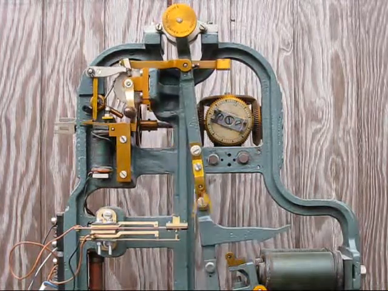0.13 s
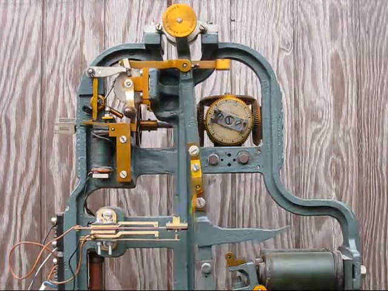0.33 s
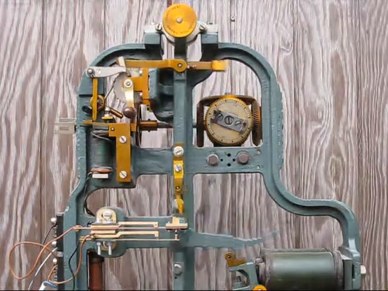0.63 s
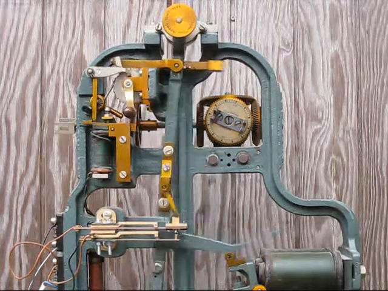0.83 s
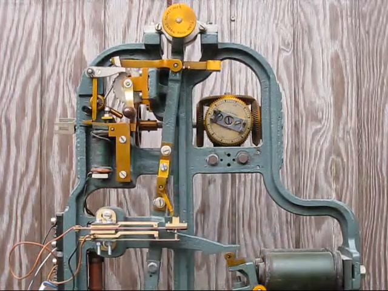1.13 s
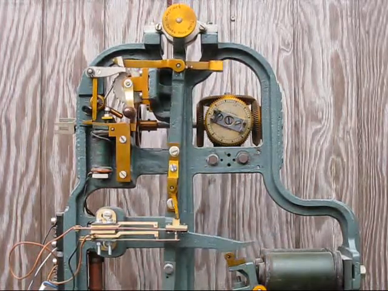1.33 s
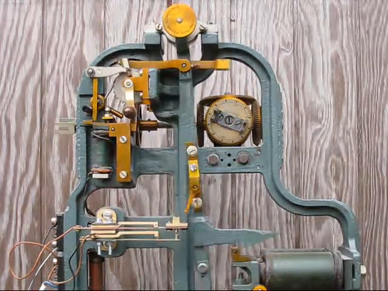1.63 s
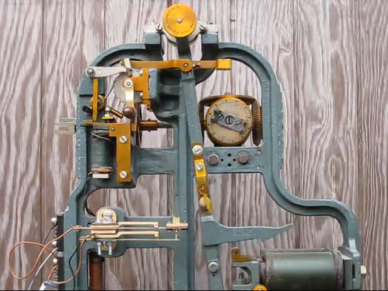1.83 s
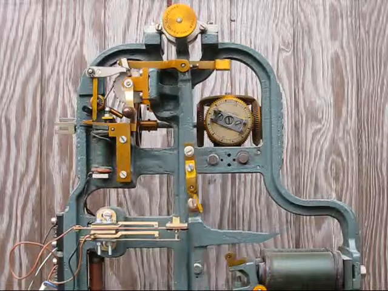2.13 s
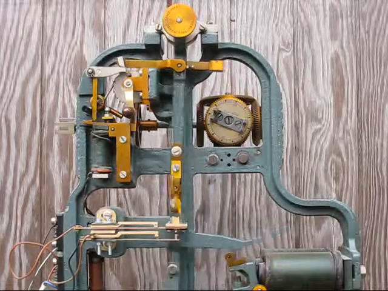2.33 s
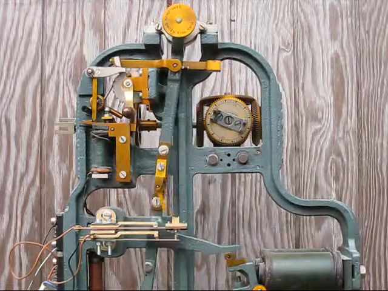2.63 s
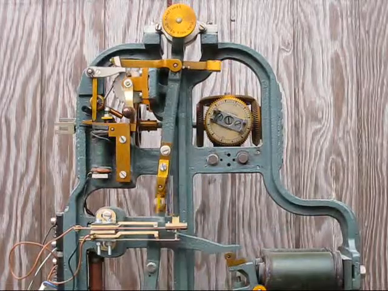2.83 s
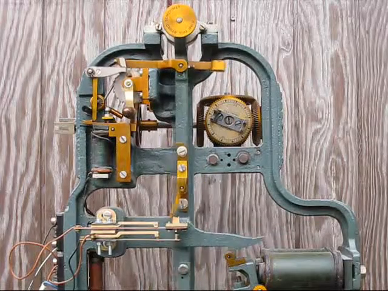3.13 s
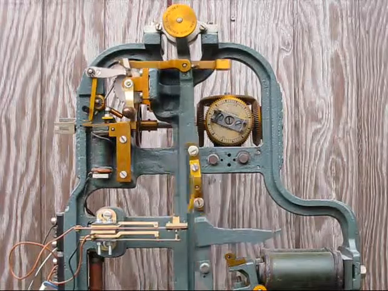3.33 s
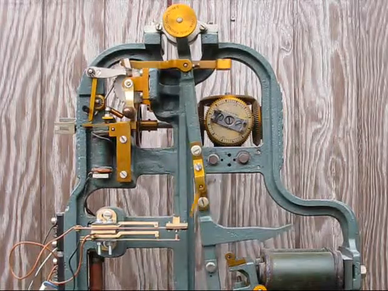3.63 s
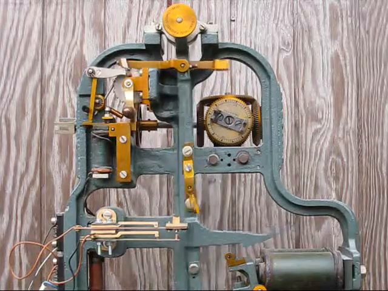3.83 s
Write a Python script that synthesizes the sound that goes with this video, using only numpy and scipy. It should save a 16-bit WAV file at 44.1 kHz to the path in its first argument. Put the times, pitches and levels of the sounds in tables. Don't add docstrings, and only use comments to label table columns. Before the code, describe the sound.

Close-miked clock mechanism snaps and pings irregularly, then levers clack into the iron frame with a short ring and woody thud; low wind puffs thump the microphone throughout, with soft hiss and one faint bird trill.

```python
import sys
import numpy as np
from scipy import signal
from scipy.fft import rfft, irfft
from scipy.io import wavfile
from scipy.ndimage import uniform_filter1d

SR = 44100
rng = np.random.default_rng(int(sys.argv[2]) if len(sys.argv) > 2 else 0)


def boost(x):
    u = np.asarray(x, float) / 20
    return 10 ** u


def transcribe(u):
    v = np.clip(np.atleast_2d(u).T, -1, 1)
    q = np.round(v * 32767).astype(np.int16)
    wavfile.write(sys.argv[1], SR, q)


N = 176400
TIME_S = np.arange(N) / SR


def rms_one(x):
    return x / np.sqrt(np.mean(x ** 2) + 1e-20)


def noise():
    return rng.standard_normal(N)


def band(x, low_hz, high_hz, order=2):
    edges_hz = [low_hz, min(high_hz, 0.45 * SR)]
    return signal.sosfilt(signal.butter(order, edges_hz, "band", fs=SR, output="sos"), x)


def clicks(s, gains):
    out = np.full(N, 1e-18)
    np.add.at(out, np.clip((np.asarray(s) * SR).astype(int), 0, N - 1), gains)
    return out


def ring(x, hz, t60_s):
    r = boost(-60 / (t60_s * SR))
    w = 2 * np.pi * hz / SR
    return signal.lfilter([0, np.sin(w)], [1, -2 * r * np.cos(w), r * r], x)


def fade(x, t60_s):
    return signal.lfilter([1], [1, -boost(-60 / (t60_s * SR))], x)


def burst(envelope, low_hz, high_hz):
    return band(envelope * noise(), low_hz, high_hz, order=3) * np.sqrt(SR / 2 / (high_hz - low_hz))


# f/Hz, density/dB per Hz
HISS_SPECTRUM = [(88, -34), (150, -37), (549, 2.5), (898, 0.5), (1230, -3), (1310, -6), (11100, -22.5),
                 (15300, -29.5), (16500, -46)]


def hiss():
    level_db = -45
    hz = np.maximum(np.arange(N // 2 + 1) * SR / N, 1)
    at_hz, db = np.transpose(HISS_SPECTRUM)
    gain = boost(np.interp(np.log(hz), np.log(at_hz), db)) * (hz > 120)
    shaped = irfft(rfft(noise()) * gain, N)
    return boost(level_db) * shaped / np.std(band(shaped, 390, 16000))


EDDY_SPAN = np.arange(-1500, 1501)


def eddy(hz, turns=0.5):
    t = EDDY_SPAN / SR * hz
    return np.sin(2 * np.pi * t + 0.5) * np.exp(-0.5 * (t / turns) ** 2)


def slap(hz):
    t = EDDY_SPAN / SR * hz
    return np.cos(2 * np.pi * t + 0.5) * np.exp(-1.5 * np.abs(t / 0.5) ** 1.49)


# t/s, peak/dB, f/Hz
PULLS = [(0.0074, -15, 265), (0.0404, -6, 565), (0.077, -9, 355), (0.2275, 4.9, 312), (0.2538, 0, 560),
         (0.3068, 0, 512), (0.669, 0, 277), (1.0368, -2.5, 353), (1.3128, -5, 252), (1.4009, -0.5, 262),
         (1.44, -7, 526), (1.6408, -3.5, 270), (2.1176, -6, 292), (2.203, -4.5, 382), (2.2125, -3, 333),
         (2.3504, -7, 267), (2.9513, -4.5, 227), (3.1859, -3.5, 225), (3.3941, -5, 310), (3.9739, -7, 203)]
# t/s, peak/dB, f/Hz
PUSHES = [(0.1226, -7, 463), (0.1374, 0.5, 513), (0.1622, -6.3, 435), (0.4276, -4.5, 330),
          (0.4522, -1.5, 365), (0.4933, -7.5, 280), (0.8293, -3.5, 270), (0.8788, -4.5, 280),
          (1.0877, -2, 314), (1.1079, -0.5, 317), (1.278, 1.5, 400), (1.34, -2.5, 234), (1.4278, -5, 330),
          (1.5658, -4, 235), (2.0512, -2, 208), (2.242, -3, 283), (2.2562, -9, 393), (2.2691, -6, 361),
          (2.306, 2.3, 517), (2.326, -4.5, 334), (2.4516, -2.5, 302), (2.5913, 1.5, 316),
          (2.6034, 0.9, 365), (2.6144, 5.5, 386), (2.6328, 1, 239), (2.7573, -2.5, 225),
          (3.0207, -1.5, 155), (3.0306, 3.7, 400), (3.0425, 1, 294), (3.2061, -2, 250)]


def add_slaps(out):
    for sign, rows in ((-1.08, PULLS), (0.74, PUSHES)):
        for at_s, peak_db, hz in rows:
            span = EDDY_SPAN + int(at_s * SR)
            ok = (span >= 0) & (span < N)
            inside = span[ok]
            calm = 1 - 1.13 * np.exp(-((TIME_S[inside] - at_s) * hz * 1.1) ** 2)
            out[inside] = calm * out[inside] + sign * boost(peak_db) * slap(hz)[ok]
    return out


# centre t/s, length/s, level/dB, eddy f/Hz
PUFFS = [(0.012, 0.022, -15, 350), (0.05, 0.0081, -28, 345), (0.122, 0.15, -17.5, 370),
         (0.243, 0.018, -15, 184), (0.256, 0.016, -20.5, 570), (0.303, 0.034, -18, 374),
         (0.348, 0.032, -20.5, 284), (0.415, 0.046, -20.5, 269), (0.491, 0.023, -16, 257),
         (0.527, 0.033, -21, 310), (0.629, 0.14, -25.5, 245), (0.668, 0.025, -16.5, 313),
         (0.708, 0.022, -24, 413), (0.762, 0.05, -30.5, 211), (0.824, 0.056, -21, 282),
         (0.883, 0.028, -18, 249), (0.946, 0.11, -22.5, 256), (1.038, 0.028, -20.5, 303),
         (1.091, 0.07, -19.5, 330), (1.23, 0.029, -23, 297), (1.283, 0.045, -20.5, 290),
         (1.345, 0.023, -18.5, 400), (1.409, 0.049, -16, 280), (1.472, 0.012, -21.5, 327),
         (1.569, 0.046, -18.5, 266), (1.644, 0.0089, -16, 480), (1.695, 0.031, -29, 202),
         (1.748, 0.042, -26, 176), (1.802, 0.031, -22.5, 194), (1.915, 0.15, -35.5, 213),
              (2.052, 0.031, -15.5, 200), (2.115, 0.052, -20, 206), (2.238, 0.069, -13, 293),
              (2.316, 0.046, -11.5, 367), (2.455, 0.043, -22, 266), (2.56, 0.051, -27.5, 148),
              (2.613, 0.045, -9.5, 275), (2.685, 0.084, -23, 191), (2.76, 0.04, -16.5, 173),
              (2.81, 0.024, -17, 207), (2.888, 0.088, -31, 152), (2.956, 0.03, -15.5, 182),
              (3.029, 0.039, -8, 247), (3.086, 0.07, -18, 202), (3.178, 0.098, -16.5, 170),
              (3.315, 0.011, -21, 180), (3.353, 0.023, -18.5, 186), (3.386, 0.03, -22, 240),
              (3.561, 0.0068, -25.5, 194), (3.629, 0.016, -27, 228), (3.808, 0.046, -28, 139),
              (3.887, 0.048, -23.5, 228), (3.977, 0.027, -15, 225)]
# t/s, level/dB
BREEZE = [
    (0.0, -22.5),
    (1.43, -25),
    (4.0, -33),
]


def wind():
    breeze_hz, breeze_db, pitch_spread_oct, puff_edge = 150, -7, 0.74, 3.57
    eddies_per_s, eddy_size_db, eddy_ceiling = 560, 5, 0.62
    even_s, evenness = 0.012, 0.8
    rumble_db, rumble_hz = -22.5, (45, 70)
    t = np.arange(0, N + 32, 32) / SR
    sizes_hz = np.geomspace(75, 1100, 7)

    def share(hz):
        weight = np.exp(-(np.log2(sizes_hz[:, None] / hz) / pitch_spread_oct) ** 2)
        return weight / weight.sum()

    s, db = np.transpose(BREEZE)
    power = share(breeze_hz) * boost(2 * (np.interp(t, s, db) + breeze_db))
    for at_s, length_s, level_db, hz in PUFFS:
        shape = np.exp(-1.4 * np.abs(2 * (t - at_s) / length_s) ** puff_edge)
        power = power + share(hz) * boost(2 * level_db + 6) * shape

    strength = boost(eddy_size_db * np.minimum(rng.exponential(1, N), 4))
    born = (rng.random(N) < eddies_per_s / SR) * strength * rng.choice([-1, 1], N)
    dealt = rng.integers(0, 7, N)
    out = np.zeros(N)
    for k, hz in enumerate(sizes_hz):
        near = (np.abs(dealt - k) < 2) * born
        envelope = np.interp(TIME_S, t, np.sqrt(power[k]))
        out += envelope * rms_one(signal.fftconvolve(near, eddy(hz), "same"))

    level = np.interp(TIME_S, t, np.sqrt(power.sum(axis=0)))
    width = int(even_s * SR)
    local = uniform_filter1d(uniform_filter1d((out / level) ** 2, width), width)
    out = out / (np.abs(local) + 0.017) ** (evenness / 2)
    out = eddy_ceiling * np.tanh(out / eddy_ceiling)

    swell = np.sqrt(np.abs(uniform_filter1d(level ** 2, int(0.056 * SR))))
    out = out + boost(rumble_db) * swell * rms_one(band(noise(), *rumble_hz, order=1))
    return add_slaps(out)


# f/Hz, level/dB, t60/s
SNAP = [(8260, -0.5, 0.0072), (8800, -2, 0.0036), (9370, -4.5, 0.0049), (10750, -3.5, 0.0044),
        (11700, -7, 0.0071), (12700, -22, 0.0087), (13700, -23, 0.0031), (15500, -20, .004)]


def pawl_snap(s, db, tilt_db):
    luck_db = rng.normal(0, 2.0, (len(s), len(SNAP)))
    out = np.zeros(N)
    for k, (hz, level_db, t60_s) in enumerate(SNAP):
        onset_s = s + 0.0003 * luck_db[:, k - 1] / 3
        mode_db = db + level_db + tilt_db * np.log2(hz / 9000) + luck_db[:, k]
        out += ring(clicks(onset_s, boost(mode_db)), hz, t60_s)
    return band(out, 6700, 22000) + ring(clicks(s, boost(db - 8)), 3030, 0.0069)


# f/Hz, level/dB, t60/s
RINGS = [(4580, 2.5, 0.039), (4540, -18, 0.013), (5884, -16, 0.036), (2050, -6, 0.025)]


def small_parts(s, db):
    lag_s = 0.00115
    return sum(ring(clicks(s + lag_s, boost(db + level_db)), hz, t60_s) for hz, level_db, t60_s in RINGS)


# t/s, snap/dB, ring/dB rel., brightness/dB
# per octave, tail/dB rel.
TICKS = [(0.0072, -12.5, -18.5, 6, -4.5), (0.68, -17.5, -9, 13, -2), (0.7543, -26.5, -16, 4, -3),
         (0.778, -32.5, -11, 3, -3), (0.9585, -14, -24, -17, -8), (1.338, -25.5, -21, -19, -5),
         (2.3298, -17.5, -10.5, 21, 1), (2.4326, -20, -17.5, 5, -7), (2.4562, -31, -16, 8, -5),
         (2.5936, -18.5, -23.5, -19, -5), (2.61, -21, -32, -14, -8), (2.9967, -22.5, -17.5, -16, -4),
         (3.0298, -36, -30, -4, -12), (3.1678, -17.5, -15, -4, 0), (3.339, -14.5, -21, 1, -10)]


def ticks():
    snap_db, tail_level_db, tail_t60_s, tail_hz = -6, -19.5, 0.091, (7200, 13500)
    s, db, ring_db, tilt_db, tail_db = np.transpose(TICKS)
    tail = fade(clicks(s, boost(db + tail_level_db + tail_db)), tail_t60_s)
    out = pawl_snap(s, db + snap_db, tilt_db)
    out += tail * rms_one(band(noise(), *tail_hz))
    return out + small_parts(s, db + ring_db)


# t/s, level/dB
PINGS = [
    (0.0105, -45),
    (0.6812, -26),
    (0.7575, -46),
    (0.959, -46),
    (2.3305, -30),
    (2.434, -49),
    (3.0, -42),
    (3.1674, -33),
]


def pings():
    s, db = np.transpose(PINGS)
    return ring(clicks(s, boost(db)), 5884, 0.075)


# f/Hz, level/dB, t60/s
FRAME = [(1040, 10, 0.048), (1162, 6, 0.17), (1218, 3.5, 0.24), (1370, 2, 0.15), (1600, -3, 0.14),
         (1886, -4.5, 0.13), (1880, 0, 0.27), (2430, -16, 0.1), (2625, -2.5, 0.13), (3370, -5, 0.15),
         (3520, -31, .08)]


def frame_ring(s, db):
    lag_s, shake_db, shake_t60_s = 0.00408, -23.5, 0.042
    shake = fade(clicks(s + lag_s, boost(db + shake_db)), shake_t60_s)
    return sum(boost(level_db) * ring(shake * noise(), hz, t60_s) for hz, level_db, t60_s in FRAME)


# f/Hz, level/dB, t60/s
LEVER = [(895, -4.5, .03), (1160, 3, 0.011), (1347, -10.5, 0.051), (1560, -2, 0.012), (1906, -4, 0.027),
         (2270, -10, 0.019), (2420, -11.5, 0.017), (3090, -13, 0.023)]


def lever_rattle(s, db):
    lag_s, rattle_db, rattle_t60_s = 0.0045, -19, 0.039
    rattle = boost(rattle_db) * fade(clicks(s + lag_s, boost(db)), rattle_t60_s)
    return sum(boost(level_db) * ring(rattle * noise(), hz, t60_s) for hz, level_db, t60_s in LEVER)


def board_thud(s, db):
    hit = clicks(s, boost(db))
    thud = boost(-5) * burst(fade(hit, 0.063), 700, 3000)
    knock = boost(-1.5) * burst(fade(hit, 0.014), 1300, 3540)
    room = boost(-21) * burst(fade(hit, 0.17), 900, 3600)
    return thud + knock + room


# low f/Hz, high f/Hz
CRACK_BANDS = [(3300, 7540), (9400, 14200)]


def cracks(s, crack_db):
    t60_s, tail_db, tail_t60_s = (0.016, 0.009), (-21.5, -21), (0.2, 0.14)
    out = np.zeros(N)
    for k, edges_hz in enumerate(CRACK_BANDS):
        hit = clicks(s, boost(crack_db[k] - 11.5))
        envelope = fade(hit, t60_s[k]) + boost(tail_db[k]) * fade(hit, tail_t60_s[k])
        out += burst(envelope, *edges_hz)
    return out


# t/s, board/dB, frame
# ring/dB, middle crack/dB, bright crack/dB
CLACKS = [(1.487, -24, -41, -23, -52), (1.5255, -70, -80, -30, -30), (1.5313, -70, -80, -25, -32),
          (1.541, -70, -80, -42, -26), (1.5678, -32, -70, -40, -68), (1.5723, -24.5, -40, -38, -55),
          (2.1337, -10, -39, -4, -15), (2.1644, -20, -34.5, -18, -28), (2.613, -52, -70, -50, -54),
          (3.1115, -39.5, -70, -37, -65), (3.2409, -20, -25.5, -4.5, 3), (3.929, -33.5, -53, -25.5, -34),
          (3.967, -39, -60, -24.5, -35)]


def clacks():
    s, board_db, frame_db, *crack_db = np.transpose(CLACKS)
    return cracks(s, crack_db) + board_thud(s, board_db) + lever_rattle(s, board_db) + frame_ring(s, frame_db)


def drift(rate_hz):
    r = np.exp(-2 * np.pi * rate_hz / SR)
    settle = 9000
    return rms_one(signal.lfilter([1], [1, -2 * r, r * r], rng.standard_normal(N + settle))[settle:])


# t/s, level/dB
WARBLE = [
    (2.6, -63),
    (2.64, -49),
    (2.85, -49),
    (3.05, -51.5),
    (3.16, -51.5),
    (3.32, -47.5),
    (3.42, -62),
]


def warble():
    flutter_db, drop_db = 6, 4
    s, db = np.transpose(WARBLE)
    edges_hz = np.geomspace(4160, 6050, 5)
    blur = np.zeros(N)
    for k, (low_hz, high_hz) in enumerate(zip(edges_hz, edges_hz[1:])):
        flutter = boost(flutter_db * drift(25.0) - drop_db * k)
        blur += flutter * rms_one(band(noise(), low_hz, high_hz))
    return boost(np.interp(TIME_S, s, db)) * rms_one(blur)


def scene():
    return (hiss() + wind() + ticks() + pings() + clacks() + warble())[None]


def roll_off(x):
    return signal.sosfilt(signal.butter(12, 16650, fs=SR, output="sos"), x)


def record(dry):
    duck_ratio, duck_from_db, recover_db_per_s, cutoff_hz = 0.96, -4, 136, 16650
    ramp_db = recover_db_per_s * TIME_S
    over_db = np.clip(20 * np.log10(np.abs(dry[0]) + 1e-9) - duck_from_db, 0, 6) * duck_ratio
    held_db = np.maximum.accumulate(over_db + ramp_db) - ramp_db
    duck_db = signal.lfilter([0.008], [1, -0.992], held_db)
    clipped = np.clip(dry * boost(-duck_db), -1, 1)
    mix = signal.sosfilt(signal.cheby2(12, 60, cutoff_hz, fs=SR, output="sos"), clipped)
    return roll_off(mix)


dry = scene()
out = record(dry)
transcribe(out)
```